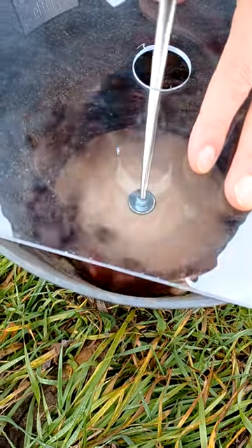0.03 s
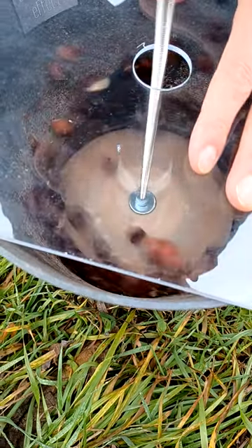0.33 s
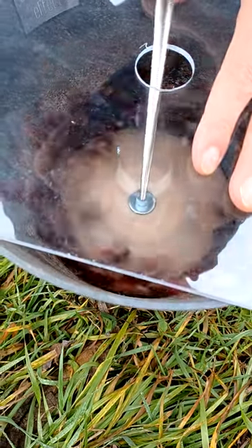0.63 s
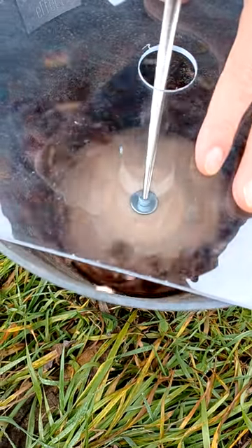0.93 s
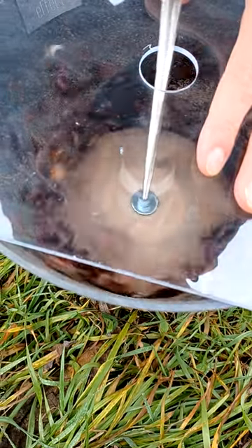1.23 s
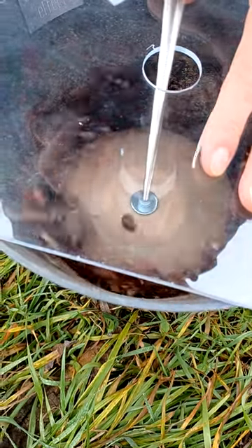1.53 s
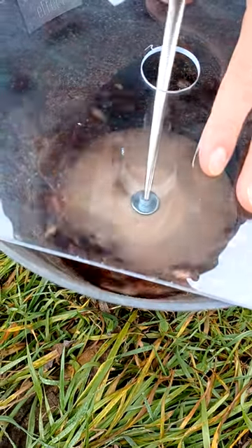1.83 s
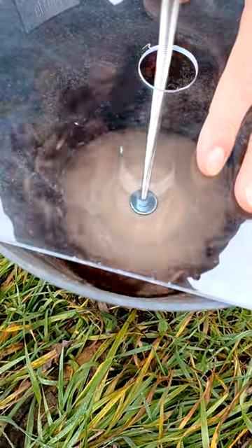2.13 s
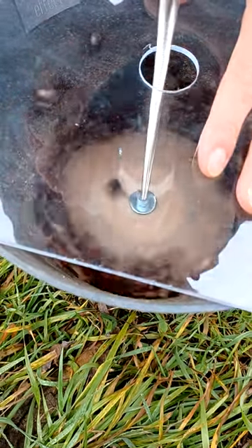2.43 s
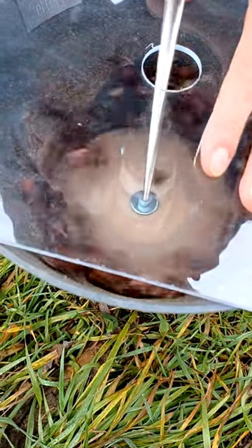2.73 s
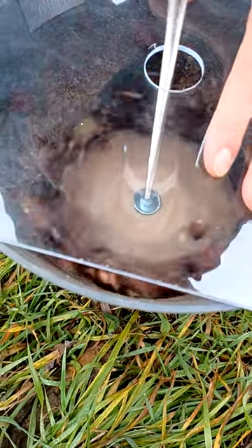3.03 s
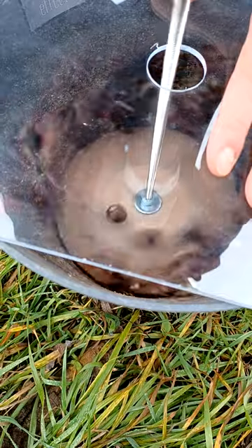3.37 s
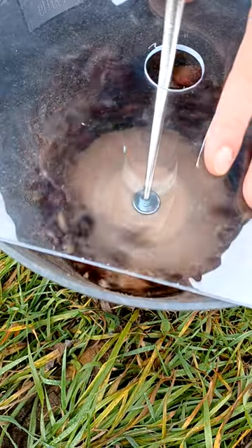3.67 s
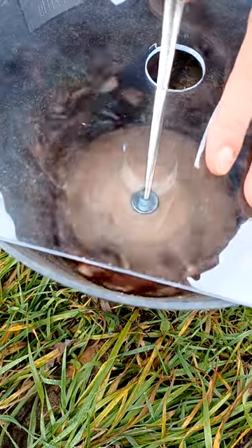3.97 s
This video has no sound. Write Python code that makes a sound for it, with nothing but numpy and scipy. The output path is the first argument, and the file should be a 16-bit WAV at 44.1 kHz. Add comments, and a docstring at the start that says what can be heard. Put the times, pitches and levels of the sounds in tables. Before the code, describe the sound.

Motorized nut peeler running, with nuts tumbling and clattering hollowly inside a metal tub.

```python
"""A small electric motor whines and hisses over the hollow drumming of nuts: a nut peeler, outdoors, close
to a left and a right microphone. The motor spins a disc inside a covered metal tub, its speed wavering
with the load. Tumbling nuts keep the tub's hollow booming near 500 Hz, rumble on the disc, clatter against
the wall and click together, while pieces of shell sizzle and crack."""
import sys
import numpy as np
from scipy import signal
from scipy.fft import rfft, irfft
from scipy.io import wavfile

SR = 44100
rng = np.random.default_rng(int(sys.argv[2]) if len(sys.argv) > 2 else 0)


def wav_record(signal):
    """Record a signal, one row per channel, as 16-bit PCM in the file named by sys.argv[1]."""
    frames = np.transpose(np.atleast_2d(signal))
    bounded = np.clip(frames, -1, 1)
    # unit amplitude maps onto the largest positive 16-bit level
    quanta = np.round(bounded * 32767).astype(np.int16)
    wavfile.write(sys.argv[1], SR, quanta)


N = 176400

# shaft speed under the wavering load: t/s, turn rate/Hz
SHAFT_SPEED = [(0.0, 204.4), (0.12, 207.4), (0.28, 202.4), (0.51, 206.2), (0.68, 206.9), (0.8, 202.1),
               (0.95, 206.4), (1.17, 205.8), (1.25, 201.3), (1.34, 207.1), (1.45, 202.1), (1.62, 206.2),
               (1.69, 201.7), (1.91, 207.6), (2.33, 204.7), (2.56, 208.5), (2.86, 204.2), (3.02, 208.5),
               (3.04, 204.6), (3.27, 208), (3.43, 203.0), (3.65, 207), (4.0, 202.2)]
# motor whine at the left microphone: multiple of the shaft speed, level/dB
WHINE_PARTIALS = [(23, -55), (30, -34.5)]
# spectrum of brush and fan hiss at each microphone: f/Hz, relative level/dB
MOTOR_HISS_LEFT = [(2500, -12), (4200, -11), (4800, 7), (6000, 9), (6400, 4), (6750, 7), (7300, -1.5),
                   (7800, -7.5), (10500, -9), (12500, 0), (16000, -1)]
MOTOR_HISS_RIGHT = [(2500, -20.5), (4200, -26), (5100, 5), (6000, -17), (6500, -30), (7100, 1), (7800, -22),
                    (10500, -18), (12200, -11), (14500, -26), (16000, -20)]
# resonance of the tub's hollow: f/Hz, relative level/dB
TUB_HOLLOW = [(250, -49.5), (400, -26.5), (425, -21), (455, -6.5), (510, 0), (555, -6), (588, -3),
              (620, -14), (680, -29.5), (1000, -49.5)]
# loudest swells of the tub's hollow booming near 500 Hz: t/s at the peak, relative level/dB
BOOM_SWELLS = [(0.136, -8), (0.197, -7.5), (0.244, -6), (0.365, -8.5), (.463, -8), (0.493, -9),
               (0.55, -7.5), (0.572, -9), (0.618, -7.5), (.651, -10), (0.694, -7.5), (.741, -7.5),
               (1.006, -8.5), (1.177, -11), (1.197, -5), (1.255, -9.5), (1.35, -6.5), (1.417, -6),
               (1.536, -7), (1.641, -8), (1.676, -7), (1.773, -8), (1.825, -8), (1.917, -8.5),
               (1.985, -7.5), (2.129, -6.5), (2.288, -10), (2.308, -8), (2.35, -9.5), (2.418, -7),
               (2.441, -7.5), (2.516, -8.5), (2.583, -8), (2.655, -11.5), (2.718, -9.5), (2.753, -8.5),
               (2.808, -6.5), (3.042, -6.5), (3.055, -5.5), (3.115, -6.5), (3.132, -9.5), (3.277, -9.5),
               (3.342, -8.5), (3.383, -9.5), (3.415, -7.5), (3.523, -10), (3.554, -6), (3.817, -9.5),
               (3.849, -7), (3.902, -7)]
# spectrum of the loaded disc's rumble: f/Hz, relative level/dB
DISC_RUMBLE = [(20, -18), (48, -63), (70, -23.5), (90, -7), (125, -6), (175, 1.5), (205, -5), (230, -0.5),
               (265, -13), (370, -10), (600, -34)]
# heavy thuds of nuts on the disc: t/s at the peak, level/dB
DISC_THUDS = [(1.504, -25), (1.77, -24), (2.465, -44), (2.652, -29)]
# response of wall and lid at each microphone: f/Hz, relative level/dB
TUB_WALL_LEFT = [(200, -12.5), (370, -4), (900, -4.5), (1450, -2.5), (1700, -4.5), (2200, 1.5), (2600, -6),
                 (3300, -11), (7000, -32.5), (16000, -25.5)]
TUB_WALL_RIGHT = [(200, -32.5), (370, -10), (700, 1), (820, 3.5), (1000, -8.5), (1170, -9.5), (1450, -7),
                  (1700, 0.5), (2250, -6.5), (2600, -10), (4200, -17), (7000, -30.5), (16000, -26)]
# ringing modes of the tub: f/Hz, bandwidth/Hz, left level/dB, right level/dB
TUB_MODES = [(980.8, 22, -29.5, -39), (1110.3, 20, -30.5, -49), (1300, 30, -44, -34.5),
             (1648, 47, -28.5, -45), (1726, 27, -31.5, -32.5), (1994, 32, -32, -37), (2385, 43, -33, -34),
             (2618, 67, -34.5, -57), (3030, 39, -38.5, -56)]
# rise and fall of the clatter and clicking: t/s, relative level/dB
CLATTER_LEVEL = [(0, 0.5), (1.22, 0), (1.32, -2), (1.4, 0.5), (2.38, 1), (2.47, -2.5), (2.6, 1.5),
                 (2.73, -0.5), (2.87, 0.5), (3.55, -1)]
# nuts hitting the wall hard: t/s, relative level/dB
WALL_CLACKS = [(0.2437, -7.5), (0.569, -7), (1.405, -7.5), (1.7576, -7), (1.7804, -7.5), (2.0871, -8.5),
               (2.1291, -6), (2.3537, -8.5), (2.8701, -7), (3.0423, -10), (3.9114, -7.5)]
# shells cracking: t/s, relative level/dB
SHELL_CRACKS = [(.172, -17), (.286, -15.5), (.404, -13), (1.058, -15), (1.274, -17), (1.494, -17),
                (1.5, -15), (2.575, -19), (3.774, -21.5)]
# spectrum of ticking and cracking shell: f/Hz, relative level/dB
SHELL_SPECTRUM = [(800, -34), (2500, -0.5), (5000, 9), (8500, 0.5), (12000, 3), (16000, -8)]


def amp(db):
    """Decibels to gain."""
    return 10 ** (np.asarray(db) / 20)


def unit(x):
    """Scales to an rms of one."""
    return x / np.sqrt(np.mean(x ** 2) + 1e-20)


def curve(points):
    """A control curve, one value per sample."""
    return np.interp(np.arange(N) / SR, *np.transpose(points))


def swell(s, width_s):
    """A smooth rise and fall around time s."""
    return np.exp(-((np.arange(N) / SR - s) / width_s) ** 2)


def drift(hz):
    """A random wander, mostly slower than hz, with an rms of one."""
    lowpass = 1 + (np.fft.rfftfreq(N, 1 / SR) / hz) ** 2
    return unit(irfft(rfft(rng.standard_normal(N)) / lowpass, N))


def add(mix, s, sound):
    """Mixes a sound in at time s."""
    part = mix[..., max(round(s * SR), 0):][..., :sound.shape[-1]]
    part += sound[..., :part.shape[-1]]


def response(points, size=8192):
    """Causal impulse response of a body with this spectrum."""
    hz, db = np.transpose(points)
    log_hz = np.log(abs(np.fft.fftfreq(size, 1 / SR)) + 1)
    log_gain = np.log(amp(np.interp(log_hz, np.log(hz), db)))
    return np.fft.ifft(np.exp(signal.hilbert(log_gain).conj())).real[:size // 2]


def colour(x, *spectra):
    """Plays x through one spectrum per channel, scaled so that white noise keeps its power in the first."""
    taps = np.array([response(points) for points in spectra])
    return signal.fftconvolve(np.atleast_2d(x), taps / np.linalg.norm(taps[0]), axes=1)[:, :N]


def impacts(per_s, spread_db, channels=1):
    """Random small impacts, a few stronger than the rest, with an rms of one."""
    shape = (channels, N)
    strength = np.minimum(rng.exponential(1, shape), 4)
    struck = rng.random(shape) < per_s / SR
    return unit(struck * rng.choice([-1, 1], shape) * amp(spread_db * strength))


def at_microphones(x, right_db, lag_s):
    """One sound at both microphones; it reaches the right one later."""
    t = np.arange(N) / SR
    return np.array([x, amp(right_db) * np.interp(t - lag_s, t, x)])


def motor(flutter=.0038, hiss_db=-28.5, whine_right_db=-41):
    """Whine on multiples of the shaft speed, far left; brush and fan hiss that pulses with each turn."""
    shaft_hz = curve(SHAFT_SPEED) * (1 + flutter * drift(hz=18))
    angle = 2 * np.pi * np.cumsum(shaft_hz) / SR
    whine = sum(amp(db + 1.5 * drift(hz=12)) * np.sin(k * angle) for k, db in WHINE_PARTIALS)
    pulse = 1 + 0.082 * np.cos(angle) + 0.12 * np.cos(2 * angle)
    noise = rng.standard_normal((2, N)) * np.array([unit(pulse), unit(1 + pulse)])
    hiss = colour(noise, MOTOR_HISS_LEFT, MOTOR_HISS_RIGHT)
    return whine * amp([[0], [whine_right_db]]) + amp(hiss_db) * hiss


def tub_boom(boom_db=-15, limit_rms=3.9, swell_width_s=0.0065, gap_s=0.0095):
    """Nuts drum on the tub and keep its hollow booming near 500 Hz, with brief loud swells."""
    drumming = colour(impacts(per_s=1500, spread_db=1.5), TUB_HOLLOW)[0]
    swing = signal.hilbert(unit(drumming))
    lull_db = -12.5 * swell(1.505, width_s=0.028)  # a moment when few nuts strike the tub
    boom = amp(boom_db + lull_db) * swing.real / np.hypot(1, abs(swing) / limit_rms)
    t = np.arange(-SR // 20, SR // 20) / SR
    swells, gaps = np.zeros(N), np.zeros(N)
    for s, db in BOOM_SWELLS:
        hz = rng.normal(518.5, 21.8)
        phase = np.angle(swing[round(s * SR)])  # the swell joins the swing that is already there
        envelope = amp(db + 2.5) * np.exp(-(t / swell_width_s) ** 2)
        add(swells, s + t[0], envelope * np.cos(2 * np.pi * hz * t + phase))
        add(gaps, s + t[0], np.exp(-(t / gap_s + .5) ** 4))  # the steady boom dips as the swell rises
    return at_microphones(boom * np.maximum(1 - gaps, 0) + swells, right_db=-3.5, lag_s=0.00011)


def disc_rumble(roll_db=-31.5, surge_db=1.5):
    """The load rolls in surges and thuds on the spinning disc."""
    rolling = colour(impacts(per_s=700, spread_db=1), DISC_RUMBLE)[0]
    swing = signal.hilbert(unit(rolling))
    surges = amp(roll_db + surge_db * drift(hz=14))
    thuds = sum(amp(db) * swell(s, width_s=0.0071) for s, db in DISC_THUDS)
    thuds /= np.hypot(abs(swing), .5)  # evens out the rumble's own swing under each thud
    return at_microphones(swing.real * (surges + thuds), right_db=1.5, lag_s=0.000434)


def wall_clatter(wall_db=-22.5, clump_db=1.5, clack_decay_s=0.0068, clack_low_hz=1520):
    """Clumps of nuts strike the metal wall, which clacks and rings in its modes."""
    hits = impacts(per_s=1800, spread_db=3.5, channels=2)
    hits *= amp(curve(CLATTER_LEVEL) + clump_db * drift(hz=34.8))
    t = np.arange(SR // 6) / SR
    highpass = signal.butter(2, clack_low_hz, "highpass", fs=SR)
    for s, db in WALL_CLACKS:
        clack = amp(db + 18.5) * np.exp(-t / clack_decay_s) * rng.standard_normal((2, len(t)))
        add(hits, s, signal.lfilter(*highpass, clack))
    wall = amp(wall_db) * colour(hits, TUB_WALL_LEFT, TUB_WALL_RIGHT)
    for hz, width_hz, left_db, right_db in TUB_MODES:
        mode = np.exp(-np.pi * width_hz * t) * np.sin(2 * np.pi * (hz * t + rng.random((2, 1))))
        strikes = hits[0] * rng.choice([-1, 1], N)
        ringing = signal.fftconvolve(strikes[None], mode, axes=1)[:, :N]
        wall += amp([[left_db], [right_db]]) * unit(ringing)
    return wall


def nut_clicks(count=24, low_hz=1384, high_hz=2832, decay_s=.0036, per_s=80, level_db=-30.5):
    """Nuts click against each other, each with its own short note, a little louder on the left."""
    t = np.arange(SR // 30) / SR
    clicks = np.zeros((2, N))
    for hz in np.geomspace(low_hz, high_hz, count):
        envelope = (1 - np.exp(-t * hz / 2)) * np.exp(-t / decay_s)
        note = envelope * np.sin(2 * np.pi * (hz * t + rng.random((2, 1))))
        clicks += signal.oaconvolve(impacts(per_s / count, spread_db=1.5), note, axes=1)[:, :N]
    return amp(level_db + curve(CLATTER_LEVEL)) * amp([[0], [-3.5]]) * unit(clicks)


def shells(grit_db=-38, clump_db=3.2, rise_s=0.0028, tail_s=0.011):
    """Bits of shell tick against the lid in a sizzle; now and then one cracks."""
    bits = amp(grit_db + clump_db * drift(hz=25)) * impacts(per_s=1100, spread_db=3.5, channels=2)
    t = np.arange(SR // 20) / SR
    snap = np.sqrt(t / rise_s * np.exp(1 - t / rise_s))
    tail = 0.18 * np.exp(-t / tail_s)
    for s, db in SHELL_CRACKS:
        add(bits, s, amp(db - 10) * (snap + tail) * rng.standard_normal((2, len(t))))
    return colour(bits, SHELL_SPECTRUM)


def scene():
    """The peeler from close by in the open air, every layer sounding from the start."""
    return motor() + tub_boom() + disc_rumble() + wall_clatter() + nut_clicks() + shells()


def record(dry, low_cut_hz=69, ceiling=.93, band_limit_hz=16000):
    """Microphone bass cut, a soft limiter that rounds off the highest peaks, and the recorder's band limit."""
    thinned = signal.sosfilt(signal.butter(4, low_cut_hz, "highpass", fs=SR, output="sos"), dry)
    limited = thinned / (1 + (thinned / ceiling) ** 10) ** (1 / 10)
    lowpass = signal.firwin(511, band_limit_hz, window=("kaiser", 9), fs=SR)
    return signal.oaconvolve(limited, lowpass[None], "same")


dry = scene()
out = record(dry)
wav_record(out)
```